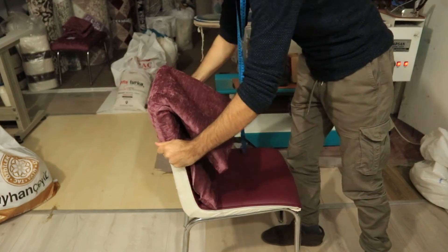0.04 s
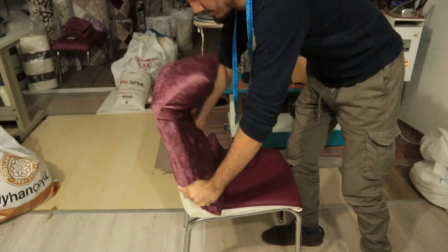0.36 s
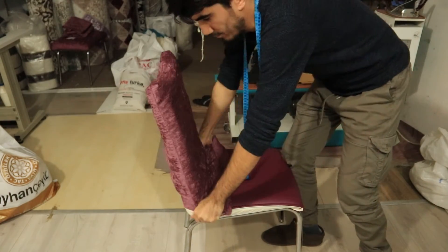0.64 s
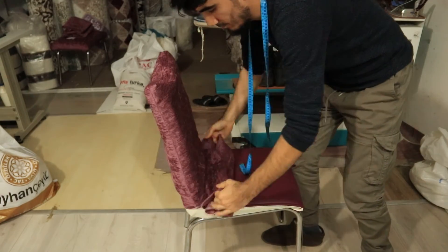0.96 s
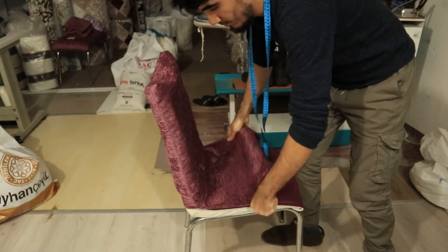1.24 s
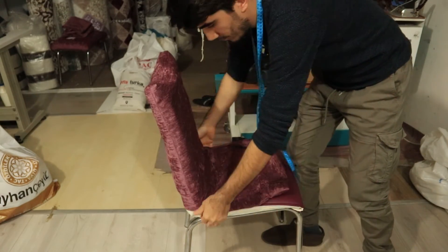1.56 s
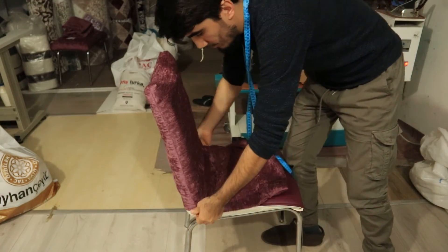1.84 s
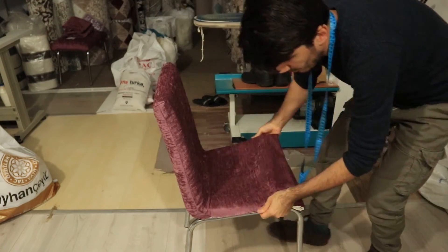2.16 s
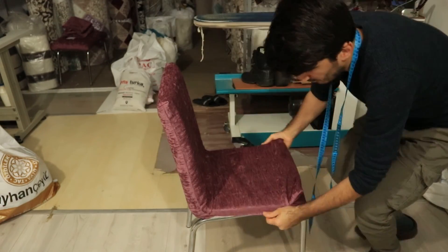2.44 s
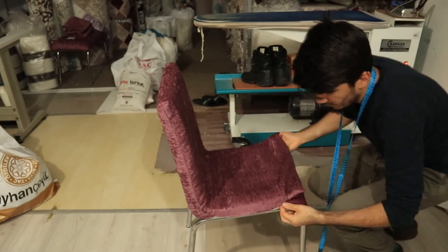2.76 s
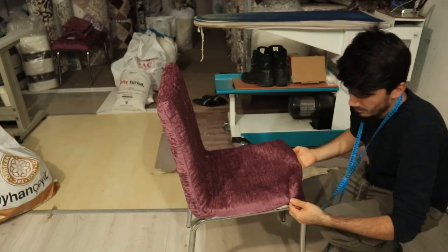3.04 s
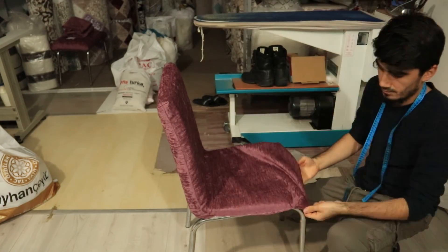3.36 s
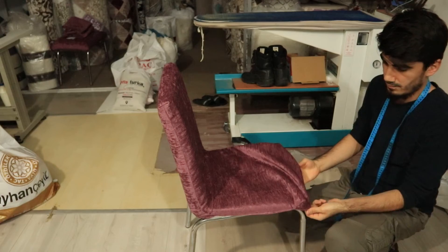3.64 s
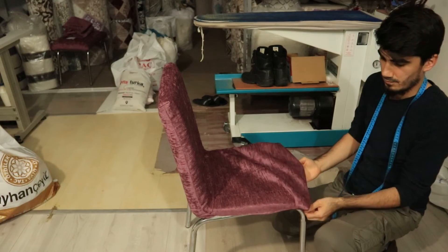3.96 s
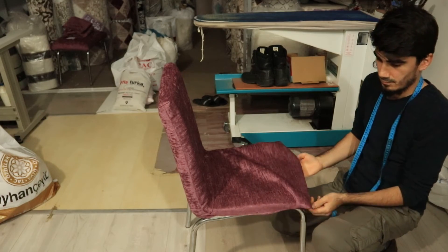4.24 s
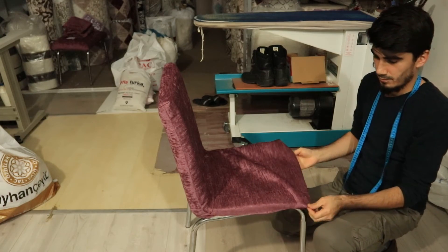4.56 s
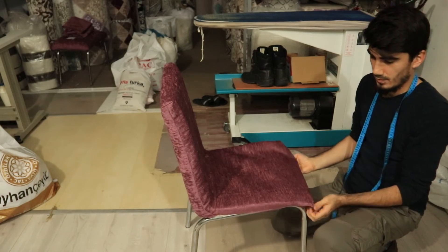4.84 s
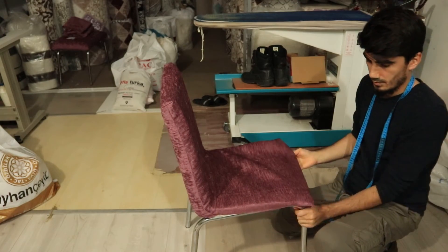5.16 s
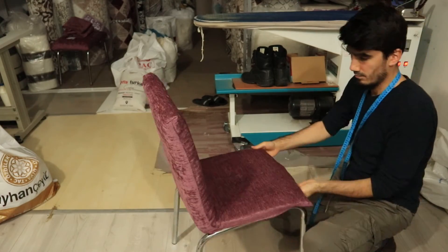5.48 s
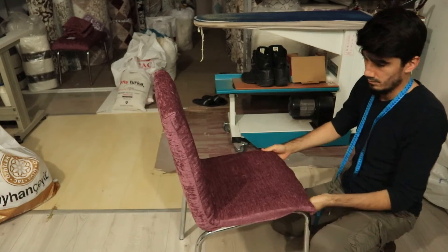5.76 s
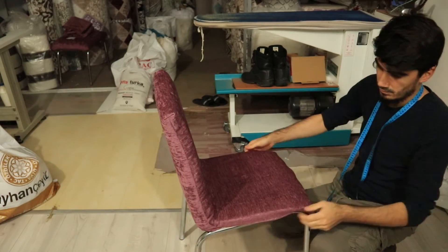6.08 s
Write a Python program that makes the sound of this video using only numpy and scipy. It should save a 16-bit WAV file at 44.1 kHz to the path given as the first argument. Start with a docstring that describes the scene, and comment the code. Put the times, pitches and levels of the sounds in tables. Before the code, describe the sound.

A velvet cover is pulled over a padded chair, starting with a firm rasp and a dull knock. Lighter rubbing and small bumps follow, then a clack on the frame and soles scuffing the floor. Hands smooth the cloth in soft strokes, the hem squeaks faintly, and the chair shifts with a cluster of knocks. It is all close to a stereo microphone in a small workshop with quiet hiss.

```python
"""A rasp of stretch velvet and a dull knock, close to a stereo microphone in a small workshop: a cover
is pulled over a padded chair and smoothed by hand. Pile catches on pile in strokes, the drag makes the
seat shell creak and drone, and hands and legs knock. Seams tick, something clacks once on the frame,
soles scuff the floor, the chair shifts and the hem squeaks. The rubbing and knocks sit near the centre;
behind them lies quiet room tone, a wide hiss and a low hum."""
import sys
import numpy as np
from scipy import signal
from scipy.fft import rfft, irfft, next_fast_len
from scipy.io import wavfile
from scipy.ndimage import uniform_filter1d

SR = 44100
rng = np.random.default_rng(int(sys.argv[2]) if len(sys.argv) > 2 else 0)


def pcm_store(signal):
    """Save signal as 16-bit PCM."""
    levels = np.round(np.clip(np.atleast_2d(signal), -1, 1) * 32767)
    wavfile.write(sys.argv[1], SR, levels.astype(np.int16).T)


N = 269451

# hand strokes over the cover, and the seat shell ringing on after two knocks:
# (start [s], length [s], release [s], pile rasp [dB], fibre hiss [dB], seat shell [dB])
STROKES = [ (0.0, 0.0037, 0.22, -51.5, -60.5, -50), (0.122, 0.38, 0.063, -35, -45.5, -41),
           (0.557, 0.03, 0.036, -34, -49.5, -35.5), (.73, 0.26, 0.046, -55, -66, -66),
           (0.862, 0.086, .02, -53, -74, -52), (0.98, .19, 0.044, -51.5, -60, -62),
           (1.212, 0.1, 0.04, -49.5, -56.5, -48), (1.306, 0.049, 0.022, -42.5, -56.5, -44),
           (1.388, 0.055, 0.019, -46, -66, -45), (1.603, 0.08, 0.026, -46.5, -72, -52),
           (2.56, 0.38, 0.09, -57.5, -63.5, -61), (2.96, 0.36, 0.11, -51, -60, -62),
           (3.257, 0.047, 0.02, -43, -61, -41), (3.478, 0.015, 0.044, -45.5, -57, -50.5),
           (3.54, 0.16, 0.03, -49, -70, -46.5), (3.843, 0.054, 0.063, -48, -62, -49),
           (3.91, 0.085, 0.028, -53.5, -67, -47), (4.051, 0.022, 0.062, -53, -63, -47.5),
           (4.477, 0.056, 0.026, -51.5, -66, -56), (4.736, 0.095, 0.031, -45.5, -58.5, -48.5),
           (4.883, 0.026, 0.025, -65, -76, -45.5), (4.967, 0.027, 0.04, -49, -56, -72),
           (5.048, 0.1, 0.05, -54.5, -62, -52), (5.138, 0.02, 0.008, -48, -63, -55),
           (5.32, 0.046, .005, -40, -53.5, -41.5), (5.427, 0.2, 0.03, -46.5, -55, -47),
           (5.648, 0.036, 0.015, -43.5, -54.5, -42), (5.703, 0.055, 0.04, -46.5, -58, -46.5),
           (5.785, 0.07, 0.05, -53, -63, -46.5), (5.955, 0.028, 0.012, -51, -61, -47)]
# spectra of the rubbing: (frequency [Hz], level [dB])
RASP_SPECTRUM = [(290, -23), (500, -13), (652, -4), (754, 2), (938, 0), (1020, 1), (2160, -1.5), (3500, -8),
                 (4300, -12), (7690, -25), (9000, -35), (11700, -45), (19800, -120)]  # pile under a hard pull
WHISPER_SPECTRUM = [(500, -38), (900, -1), (1400, -24), (1950, -2), (2350, -5), (2800, -3), (3300, -19),
                    (5000, -22), (8000, -54), (12000, -36)]  # pile under a light touch
FIZZ_SPECTRUM = [(3000, -11), (5500, 2), (7500, 0), (9500, 2), (11200, 2), (12800, -8), (15000, -27)]  # fibres and floor grit
BODY_SPECTRUM = [(53, -63), (90, 4.5), (128, 0), (167, -8.5), (204, 1.5), (246, -5.5), (291, 6.5),
                 (374, -3.5), (481, 5.5), (618, -1), (747, -1.5), (838, -13.5), (1100, -24), (1430, -24),
                 (2420, -120)]  # the shaken seat shell
SOLE_SPECTRUM = [(300, -6), (550, -4), (800, -6), (1200, -11.5), (1700, -4.5), (2400, -5), (3400, -7.5),
                 (4800, -11.5), (6500, -23), (9000, -30), (14000, -59)]  # a sole on the floor
LEG_SPECTRUM = [(25, -31), (50, -26), (70, 14), (100, 1), (150, 8), (220, -17), (400, -43), (1000, -70)]  # chair legs on the floor
GLIDE_SPECTRUM = [(1200, -40), (2000, -6), (2450, 0.5), (2900, -3), (3400, -14), (5000, -15), (9000, -35)]  # taut fabric on the seat edge
# resonances of seat shell and frame: (frequency [Hz], level [dB], t60 [s])
SHELL_MODES = [(146, 1, 0.26), (225.6, 5.5, 0.26), (277, -12.5, 0.11), (354, 7, 0.26), (400, 9, 0.037),
               (490, -11.5, 0.38), (493, -2, 0.61), (559, 2, 0.96), (632, 11, 0.053), (767, -10, 0.12),
               (896, -7, .1), (1230, -15, .08)]
# hiss of the workshop: (frequency [Hz], level [dB])
ROOM_TONE_SPECTRUM = [(12, -47), (20, -39), (49, 0), (74, -7.5), (106, 1), (157, -7.5), (207, -10.5),
                      (315, -8.5), (649, -11.5), (767, -12.5), (1070, -14.5), (2400, -15), (4430, -22),
                      (11700, -34), (15500, -53)]
# air swaying as the body moves: (time [s], level [dB])
AIR_SWAY = [(0, -66), (.5, -45.5), (1.2, -59), (1.798, -55), (2.1, -50), (2.6, -61), (2.9, -67)]
# dry snaps of seam, hem, sole and chair foot: (time [s], level [dB], centre [Hz], decay [s])
TICKS = [(.168, -23.5, 2060, 0.0021), (1.259, -39.5, 1804, 0.0046), (1.311, -40, 1290, 0.0039),
         (1.328, -32, 1600, 0.0029), (1.331, -41.5, 1110, 0.033), (1.346, -42, 1500, 0.0027),
         (1.605, -49.5, 10400, 0.0022), (1.846, -40, 1670, 0.012), (1.857, -52.5, 8330, 0.0071),
         (1.932, -36, 2960, 0.016), (2.066, -37.5, 9200, 0.0015), (2.077, -40, 7500, 0.0014),
         (2.081, -49, 1900, 0.0093), (2.237, -36.5, 2110, 0.0085), (3.449, -52.5, 11400, 0.012),
         (3.487, -52, 5900, 0.0084), (3.7465, -58, 10540, 0.0037), (3.751, -43.5, 1010, .012),
         (3.884, -39, 1170, 0.011), (4.703, -47, 1588, 0.013), (4.931, -56.5, 10680, 0.012),
         (5.369, -45, 5900, 0.0011), (5.663, -34, 1130, 0.014), (5.676, -38, 1217, 0.01),
         (5.963, -58, 9600, 0.0066)]
# dull blows on chair and floor: (time [s], level [dB], pitch [Hz], decay [s], relative contact [dB])
KNOCKS = [(.1683, 1.5, 380, .0016, -11), (.171, -16, 135, .008, -25), (.178, -20, 680, .004, -7),
          (.182, -21, 260, .007, -12), (.5455, -29, 290, .005, -10), (.61, -32, 533, .005, -10),
          (.6995, -29.5, 510, .003, -4), (1.261, -30, 400, .0062, -4), (1.3132, -21.5, 358, .0027, -1),
          (1.3275, -22, 430, .0018, 2), (1.4003, -19.5, 430, .004, -6), (1.5284, -24.5, 420, .004, -5),
          (1.901, -37, 501, .008, -20), (1.855, -33, 395, .0075, -8), (2.078, -39, 404, .0046, -10),
          (2.235, -28, 302, .0051, -2), (2.351, -27, 150, .009, -4), (2.384, -31, 230, .0062, -6),
          (2.458, -37.5, 379, .0096, -8), (2.752, -35.5, 568, .006, -7), (3.27, -31, 400, .004, -5),
          (3.319, -31, 497, .008, -8), (3.75, -35, 554, .005, 2), (3.8832, -15, 335, .0095, -9),
          (4.8775, -22.5, 466, .0022, -12), (5.4985, -21, 293, .0037, -5), (5.514, -30, 480, .003, -4),
          (5.546, -32, 600, .002, -2), (5.572, -29, 500, .006, -9), (5.6063, -15.5, 300, .003, -4),
          (5.62, -22, 210, .005, -10), (5.6505, -15.5, 340, .003, -1), (5.6565, -20, 330, .004, -9),
          (5.6735, -18.5, 510, .008, -6), (5.6814, -15, 390, .0055, -10), (5.6975, -23, 330, .005, -12),
          (5.717, -34, 560, .004, -3), (5.763, -29, 330, .005, -7), (5.9469, -17, 430, .0042, -2),
          (5.9615, -29, 620, .004, -3), (6.0783, -22.5, 300, .005, -4)]
# damped swings of each blow: (pitch [ratio], level [dB], decay [ratio])
THUD_MODES = [(.73, -10, 1.2), (1.0, 0, 1.0), (1.5, -12, .8)]
# the rattle after a blow: (frequency [Hz], level [dB])
RATTLE_SPECTRUM = [(100, -32), (400, 3.5), (800, 4), (1100, -4), (1400, -14), (2300, -15), (3200, -33),
                   (6000, -60)]
# the tube frame ringing: (time [s], pitch [Hz], level [dB], t60 [s])
FRAME_RINGS = [(.172, 566, -14, 0.067), (3.9, 549, -37.5, 0.47), (4.06, 547, -41, 0.18),
               (4.89, 547, -33, 0.13), (5.674, 546, -33, 0.37), (5.955, 546, -29.5, 0.14)]
# the taut cover slipping down the backrest: (time [s], pitch [Hz], level [dB])
DRONE_CURVE = [(0.709, 116.3, -60), (0.749, 103.7, -43), (.85, 97.7, -45.5), (.94, 96.5, -41),
               (.99, 99.5, -55)]
# a hard tap on the frame: (frequency [Hz], level [dB], t60 [s])
CLACK_MODES = [(1616, -33, 0.06), (1740, -33.5, 0.05), (2310, -40, 0.023), (3670, -41, .016)]
# soles on the floor: (start [s], length [s], release [s], slide [dB], grit hiss [dB])
SCUFFS = [(1.928, 0.022, 0.05, -37, -49.5), (2.068, 0.0066, 0.033, -41, -44),
          (2.172, 0.11, 0.068, -47, -44), (2.223, 0.04, 0.087, -37.5, -43), (2.252, 0.05, 0.05, -35, -44.5),
          (2.298, 0.024, 0.018, -32, -51), (2.432, 0.086, 0.055, -42.5, -46.5)]
# slides: (start [s], length [s], release [s], level [dB])
CHAIR_SHIFTS = [(3.587, 0.51, .03, -52), (5.43, .15, .025, -40.5), (5.6, 0.1, 0.03, -35.5)]  # the chair on the floor
COVER_GLIDES = [(3.941, 0.21, 0.45, -53)]  # the cover along the seat edge
# the hem squeaking round the seat corner: (time [s], centre [Hz], level [dB])
HEM_CURVE = [(4.74, 1088, -61), (4.779, 960, -53), (4.827, 801, -44), (4.869, 765, -52), (4.899, 672, -75)]
# likeness of left and right in the finished sound; the highest treble is mono:
# (frequency [Hz], correlation [-1 to 1])
ACTION_LIKENESS = [(100, 1), (2000, 0.98), (3200, 0.81), (4500, 0.28), (7500, 0.083), (9200, 0.95),
                   (12000, 1)]  # cloth, chair, feet and the room's tail
HISS_LIKENESS = [(100, 1), (300, 0.19), (700, -0.08), (1200, -0.25), (2400, 0.38), (4000, -0.086),
                 (7000, -0.58), (9500, -0.19), (11200, 1)]  # the steady hiss
# echoes off the floor, then walls and benches: (delay [s], gain [ratio])
ECHOES = [(.0047, 0.3), (0.013, 0.23), (0.019, 0.24), (0.026, 0.19), (0.034, 0.14), (0.038, 0.11),
          (.0446, .1)]
# the workshop's reverberation: (frequency [Hz], t60 [s])
ROOM_DECAY = [(100, 0.48), (300, 0.14), (600, 0.31), (1500, 0.045), (5000, 0.11), (14000, 0.04)]


def amp(db):
    """Decibels to gain."""
    return 10 ** (np.asarray(db) / 20)


def unit(x):
    """Scales to an rms of one."""
    return x / np.sqrt(np.mean(x ** 2) + 1e-20)


def read(points, hz):
    """Reads a table on a log-frequency axis."""
    f, value = np.transpose(points)
    return np.interp(np.log(hz + 1), np.log(f + 1), value)


def add(mix, s, sound):
    """Mixes a sound in at a time."""
    part = mix[..., max(round(s * SR), 0):][..., :sound.shape[-1]]
    part += sound[..., :part.shape[-1]]


def colour(x, spectrum):
    """Gives a signal a spectrum, at an rms of one."""
    size = next_fast_len(x.shape[-1])
    gain = amp(read(spectrum, np.fft.rfftfreq(size, 1 / SR)))
    return unit(irfft(rfft(x, size) * gain, size)[..., :x.shape[-1]])


def wander(per_s):
    """A random drift that turns so many times a second."""
    return unit(np.interp(np.arange(N) / SR * per_s, np.arange(8000), rng.standard_normal(8000)))


def stereo(mid, side, likeness):
    """Blends two unrelated signals into a pair that is alike by a given amount in each band."""
    size = next_fast_len(N)
    same = np.clip(read(likeness, np.fft.rfftfreq(size, 1 / SR)), -1, 1)
    m = rfft(mid, size) * np.sqrt((1 + same) / 2)
    s = rfft(side, size) * np.sqrt((1 - same) / 2)
    return irfft(np.array([m + s, m - s]), size)[:, :N]


def gesture(s, db):
    """A gain that follows a short level curve and is silent outside it."""
    return amp(np.interp(np.arange(N) / SR, s, db, left=-200, right=-200))


def swells(starts, lengths, releases, levels, rise_share=0.35, longest_rise_s=0.1):
    """The joint gain of several swells: each rises, holds to the end of its length and dies away."""
    t, power = np.arange(N) / SR, np.zeros(N)
    for start, length, release_s, db in zip(starts, lengths, releases, levels):
        rise = np.clip((t - start) / min(rise_share * length, longest_rise_s), 0, 1)
        release = np.exp(-np.clip((t - start - length) / release_s, 0, 20))
        power += (amp(db) * rise * release) ** 2
    return np.sqrt(power)


def slips(per_s, spread_db, smooth):
    """Two trains of tiny stick-slip releases of uneven size over a smooth sliding noise."""
    size = amp(spread_db * np.minimum(rng.exponential(1, (2, N)), 4))
    sign = rng.choice([-1, 1], (2, N))
    released = rng.random((2, N)) < per_s / SR
    return unit(unit(size * sign * released) + smooth * rng.standard_normal((2, N)))


def ring(modes):
    """The dying sines of a struck object."""
    t = np.arange(SR // 2) / SR
    return sum(amp(db - 60 * t / t60) * np.sin(2 * np.pi * hz * t) for hz, db, t60 in modes)


def reflections(x, share):
    """The direct path to the microphone and a share of the echoes off nearby surfaces."""
    near = x.copy()
    for delay, gain in ECHOES:
        add(near, delay, share * gain * x)
    return near


def workshop(x, share, wet_db):
    """A sound in the small room: direct sound, near echoes and a short diffuse tail."""
    n = SR // 2
    taps = rng.standard_normal((2, n)) * (rng.random((2, n)) < 0.06)
    taps *= np.arange(n) > 0.007 * SR  # the tail arrives 7 ms late
    hz, t, bands = signal.stft(taps, SR, nperseg=256)
    tail = signal.istft(bands * amp(-60 * t / read(ROOM_DECAY, hz)[:, None]), SR, nperseg=256)[1]
    wet = signal.fftconvolve(x[None], tail / np.linalg.norm(tail[0]), axes=1)[:, :N]
    return reflections(x, share) + amp(wet_db) * stereo(*wet, ACTION_LIKENESS)


def velvet():
    """Close up, pile catches on pile: a light touch whispers in narrow bands, a hard pull rasps."""
    start, length, release, rasp_db, hiss_db, _ = np.transpose(STROKES)
    force = swells(start, length, release, rasp_db)
    fizz_gain = swells(start, length, release, hiss_db)
    hardness = force / (force + amp(-54.5))
    catches = slips(per_s=3500, spread_db=0.5, smooth=0.41) * amp(1.9 * wander(per_s=110))
    rasp = colour(catches, RASP_SPECTRUM) * amp(0.3)
    whisper = colour(slips(per_s=4000, spread_db=3, smooth=0.27), WHISPER_SPECTRUM) * amp(-3)
    fizz = colour(slips(per_s=5000, spread_db=2, smooth=1), FIZZ_SPECTRUM)
    fizz *= amp(-1 + 0.18 * wander(per_s=120))
    pile = np.sqrt(hardness) * rasp + np.sqrt(1 - hardness) * whisper
    return stereo(*(force * pile + fizz_gain * fizz), ACTION_LIKENESS)


def seat_shell():
    """The dragged cover shakes the seat shell in uneven slips; it rings on, as it does after two knocks."""
    start, length, release, _, _, shell_db = np.transpose(STROKES)
    drive = swells(start, length, release, shell_db)
    catches = slips(per_s=500, spread_db=2.5, smooth=1) * amp(1.8 * wander(per_s=58))
    creak = colour(catches, BODY_SPECTRUM) * drive
    modes = ring(SHELL_MODES)
    modes /= np.linalg.norm(modes)
    ringing = signal.fftconvolve(unit(catches) * drive, modes[None], axes=1)[:, :N]
    return stereo(*(creak * amp(3) + ringing * amp(-4)), ACTION_LIKENESS)


def room_tone():
    """Steady room hiss, a wavering electrical hum and a low sway of air."""
    hiss = stereo(*colour(rng.standard_normal((2, N)), ROOM_TONE_SPECTRUM), HISS_LIKENESS)
    hiss *= amp(-47 + 0.046 * wander(per_s=4.8))
    hum = unit(np.sin(2 * np.pi * 101 * np.arange(N) / SR + 3.6 * wander(per_s=10)))
    hum *= amp(-73.5 + 1.3 * wander(per_s=3.1))
    air = colour(rng.standard_normal(N),
                 [(15, 1.5), (36, -6), (70, -14), (130, -9), (400, -12.5), (1500, -92)])
    return hiss + hum + air * gesture(*np.transpose(AIR_SWAY))


def ticks():
    """Seam, hem, sole and chair foot snap in short bursts of noise."""
    out, t = np.zeros(N), np.arange(SR // 8) / SR
    for s, db, hz, decay in TICKS:
        band = [(hz / 8, -22), (hz / 2, -9), (hz, 0), (hz * 2, -20), (hz * 4, -42)]
        burst = colour(rng.standard_normal(len(t)), band)
        add(out, s, amp(db) * burst * np.exp(-t / decay))
    return out


def knocks(contact_s=0.00024, rise_s=0.0005, rattle_s=0.011, band_hz=(125, 2200)):
    """Each padded blow is a contact click, a few damped swings, a rattle and a faint shell ring."""
    out, t = np.zeros(N), np.arange(SR // 2) / SR
    shell_ring = amp(-48) * ring(SHELL_MODES)
    click = (t / contact_s - 1) * np.exp(-t / contact_s)
    for s, db, hz, decay, contact_db in KNOCKS:
        thud = -sum(amp(mode_db) * np.sin(2 * np.pi * hz * ratio * t) * np.exp(-t / (decay * share))
                    for ratio, mode_db, share in THUD_MODES)
        thud *= 1 - np.exp(-t / rise_s)
        rattle = colour(rng.standard_normal(len(t)), RATTLE_SPECTRUM) * np.exp(-t / rattle_s)
        contact = amp(contact_db) * (click + amp(-11.5) * rattle)
        add(out, s, amp(db) * (thud + contact + shell_ring))
    # the padding swallows the treble, and a chair is too small to radiate deep bass
    padded = signal.sosfilt(signal.butter(2, band_hz, "bandpass", fs=SR, output="sos"), out)
    return signal.sosfilt(signal.butter(4, 4500, fs=SR, output="sos"), padded)


def tube_frame(rise_s=0.0042):
    """The tube frame sings briefly after a blow or a tug."""
    out, t = np.zeros(N), np.arange(SR // 2) / SR
    for s, hz, db, t60 in FRAME_RINGS:
        add(out, s, ring([(hz, db, t60)]) * (1 - np.exp(-t / rise_s)))
    return out


def backrest_drone():
    """The taut cover slips at a nearly regular rate and the backrest hums."""
    s, hz, db = np.transpose(DRONE_CURVE)
    pitch = np.interp(np.arange(N) / SR, s, hz) * (1 + 0.014 * wander(per_s=23))
    phase = 2 * np.pi * np.cumsum(pitch) / SR
    return unit(np.sin(phase) + 0.13 * np.sin(2 * phase)) * uniform_filter1d(gesture(s, db), size=600)


def clack(at_s=1.853, rise_s=0.00055):
    """Something hard taps the frame once, and its high modes die quickly."""
    out, t = np.zeros(N), np.arange(SR // 8) / SR
    add(out, at_s, ring(CLACK_MODES)[:len(t)] * (1 - np.exp(-t / rise_s)))
    return out


def sole_scuffs():
    """Soles slide over the workshop floor as the feet step back; grit under them hisses."""
    start, length, release, slide_db, grit_db = np.transpose(SCUFFS)
    slide = colour(slips(per_s=4800, spread_db=1.5, smooth=0.9), SOLE_SPECTRUM)
    slide *= amp(1.1 * wander(per_s=65))
    slide *= swells(start, length, release, slide_db, rise_share=0.38)
    grit = colour(slips(per_s=6900, spread_db=2, smooth=1), FIZZ_SPECTRUM) * amp(-7.5)
    grit *= swells(start, length, release, grit_db, rise_share=0.38)
    return stereo(*(slide + grit), ACTION_LIKENESS)


def chair_legs():
    """The legs stick and slip on the floor, rumbling as the chair shifts."""
    rumble = colour(slips(per_s=270, spread_db=4.5, smooth=0.84), LEG_SPECTRUM)
    return stereo(*(rumble * swells(*np.transpose(CHAIR_SHIFTS))), ACTION_LIKENESS)


def cover_glide():
    """Taut fabric slides lightly along the seat edge with a narrow hiss that fades slowly."""
    hiss = colour(slips(per_s=3000, spread_db=2.5, smooth=1), GLIDE_SPECTRUM)
    return stereo(*(hiss * swells(*np.transpose(COVER_GLIDES))), ACTION_LIKENESS)


def hem_squeak():
    """A fuzzy squeak, dead centre, falls in pitch as the hem slides to rest."""
    s, hz, db = np.transpose(HEM_CURVE)
    phase = 2 * np.pi * np.cumsum(np.interp(np.arange(N) / SR, s, hz)) / SR
    narrow_noise = wander(per_s=420) * np.sin(phase) + wander(per_s=270) * np.cos(phase)
    return unit(narrow_noise) * gesture(s, db)


def scene():
    """Cloth, chair and feet close to the microphone, with the workshop behind them."""
    rubbing = reflections(velvet() + cover_glide() + sole_scuffs(), share=0.5) * amp(-0.26)
    direct = hem_squeak() + seat_shell() + chair_legs() + backrest_drone() + tube_frame()
    blows = workshop(knocks(), share=0.43, wet_db=-13.5)
    snaps = workshop(ticks() + clack(), share=0.7, wet_db=-9)
    return rubbing + direct + blows + snaps + room_tone()


def record(dry):
    """The recorder passes the sound up to 15.1 kHz."""
    lowpass = signal.firwin(511, 15100, window=("kaiser", 9), fs=SR)
    return signal.oaconvolve(dry, lowpass[None], "same", axes=1)


dry = scene()
out = record(dry)
pcm_store(out)
```